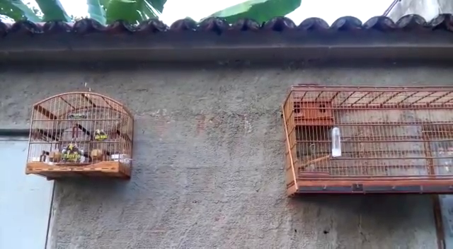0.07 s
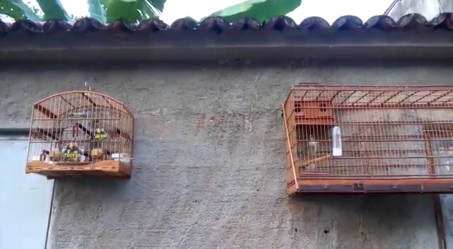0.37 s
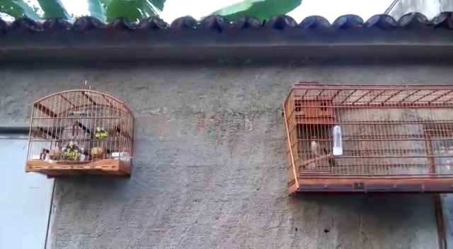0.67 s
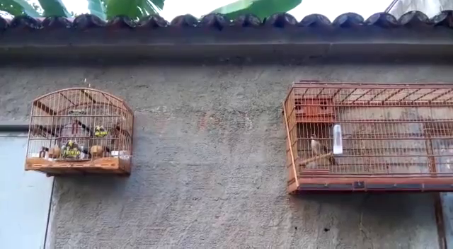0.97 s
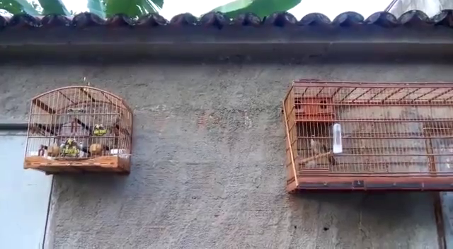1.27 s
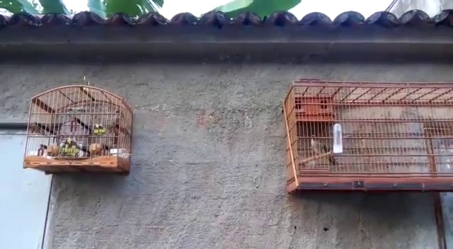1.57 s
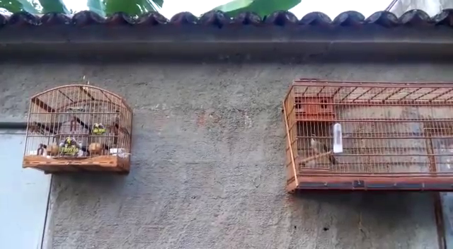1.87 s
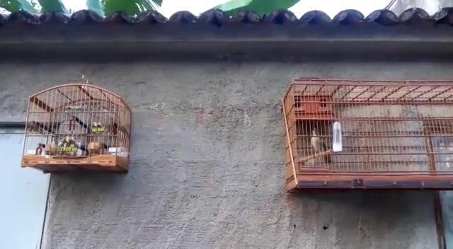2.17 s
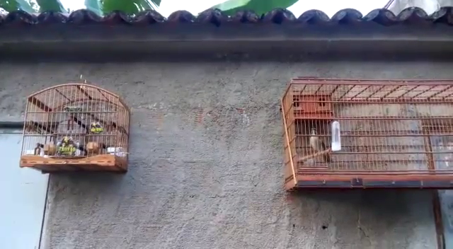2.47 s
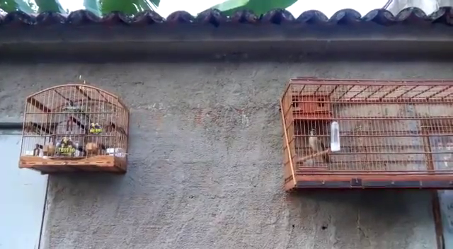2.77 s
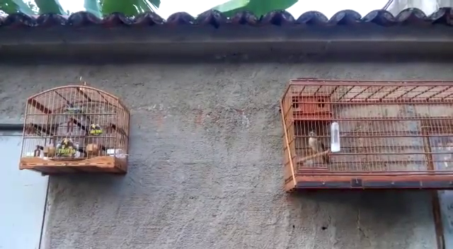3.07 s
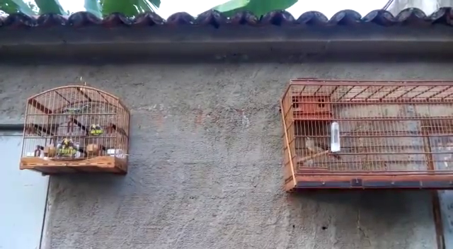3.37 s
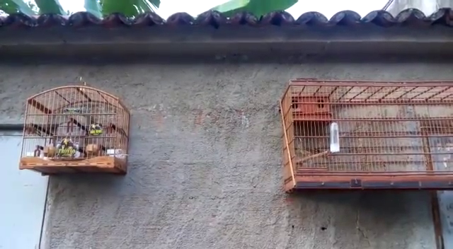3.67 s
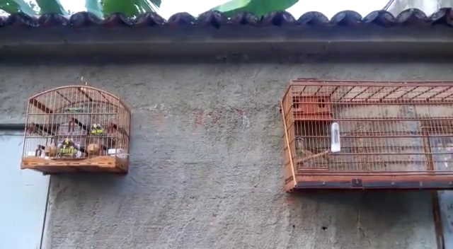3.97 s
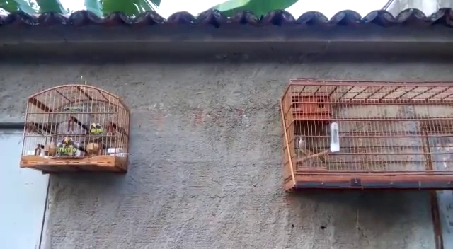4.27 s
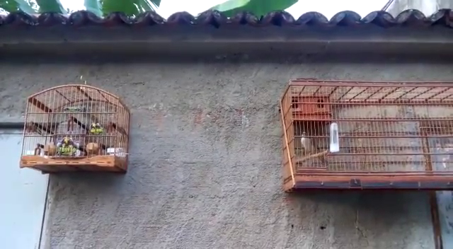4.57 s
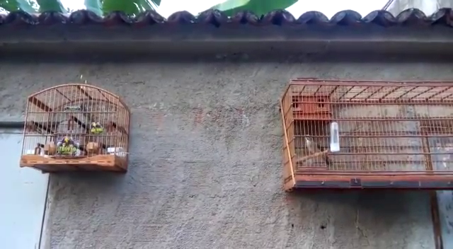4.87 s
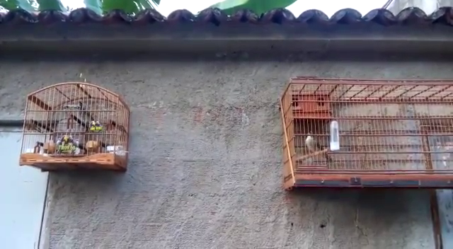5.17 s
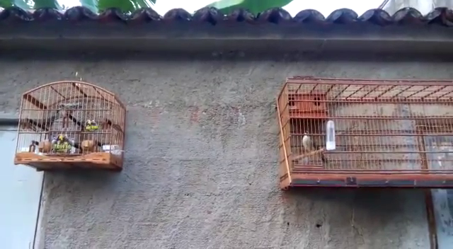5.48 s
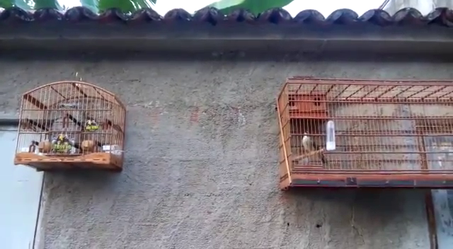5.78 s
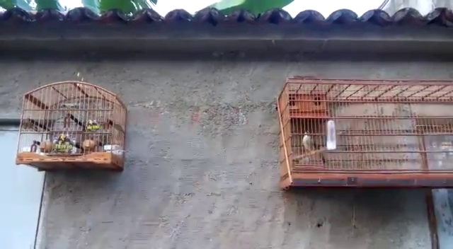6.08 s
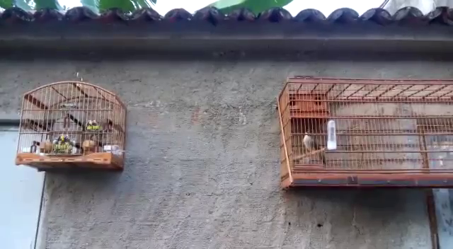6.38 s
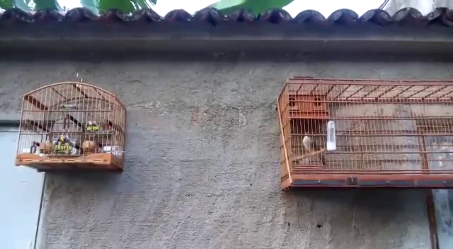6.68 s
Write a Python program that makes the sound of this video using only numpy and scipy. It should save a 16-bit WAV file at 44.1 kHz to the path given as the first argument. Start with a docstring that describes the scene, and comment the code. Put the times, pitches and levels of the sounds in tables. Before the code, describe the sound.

Faint outdoor air and a thin hiss fill a walled yard for about seven seconds. A nearby caged songbird gives a very short, piercing chirp right at the start, slightly overloading the microphone. Its cage ticks lightly around 0.6 and 1 second. At about 1.3 seconds one hard, sharp knock echoes briefly off the walls. A second loud chirp comes at 2.8 seconds. Throughout, other birds farther off give soft hoarse calls, thin high notes and a few faint hoots. Between 4 and 5 seconds the cage ticks again and a faint low rumble swells, returning around 6 seconds. From 5.4 seconds to the end, the songbird sings five clear falling whistles in quick succession, growing louder, the last one longer and fading away. Two more sharp chirps cut in among them at 6 and 6.7 seconds.

```python
"""Over faint outdoor air and a far hoarse call, a caged songbird chirps sharply in a walled yard. Both sides of
its syrinx sound at once and beat; the loudest chirps flatten at full scale. The cage ticks as it hops, other
birds call and hoot softly farther off, and one hard knock echoes round the walls. A low rumble swells, and the
songbird ends on a run of five falling whistles with two more chirps among them."""
import sys
import numpy as np
from scipy import signal
from scipy.fft import rfft, irfft
from scipy.io import wavfile

SR = 44100
rng = np.random.default_rng(int(sys.argv[2]) if len(sys.argv) > 2 else 0)


def store_wav(level_fs):
    """Save 16-bit WAV to argv[1]."""
    pcm = np.round(np.clip(np.atleast_2d(level_fs), -1, 1) * 32767)
    wavfile.write(sys.argv[1], SR, pcm.T.astype(np.int16))


N = 300762
TIME = np.arange(N) / SR


def from_db(db):
    return 10 ** (np.asarray(db) / 20)


def rms_one(x):
    return x / np.sqrt(np.mean(x ** 2) + 1e-20)


def at_hz(points, hz):
    """Read a curve on a log-frequency axis."""
    freqs, values = np.transpose(points)
    return np.interp(np.log(np.maximum(hz, 1)), np.log(freqs), values)


def coloured(x, eq):
    """Shape a sound with an EQ curve."""
    hz = np.arange(len(x) // 2 + 1) * SR / len(x)
    return irfft(rfft(x) * from_db(at_hz(eq, hz)), len(x))


def drift(rate_hz):
    """Random wander of spread 1, changing rate_hz times a second."""
    return rms_one(np.interp(TIME * rate_hz, np.arange(N), rng.standard_normal(N)))


def during(start_s, length_s):
    """The samples of a note, and the time since its start."""
    on = (TIME >= start_s) & (TIME < start_s + length_s)
    return on, TIME[on] - start_s


def swell(t, length_s, attack_s, release_s):
    """Smooth fade in and fade out."""
    rise = np.sin(np.pi / 2 * np.clip(t / attack_s, 0, 1))
    fall = np.sin(np.pi / 2 * np.clip((length_s - t) / release_s, 0, 1))
    return (rise * fall) ** 2


def reverb(x, tail):
    """Play a sound through a tail scaled to unit energy."""
    return signal.fftconvolve(x, tail / np.sqrt(np.sum(tail ** 2)))[:N]


# EQ of the outdoor air: freq_hz, gain_db
AIR_EQ = [(15, -48), (25, -27.5), (32, -19.5), (46, -10), (74, 0), (161, -3.5), (204, -8), (319, -7),
          (414, -11.5), (500, -9), (801, -13), (1670, -17), (1960, -21), (5680, -22.5), (7020, -25.5),
          (9130, -56), (15400, -120)]
# EQ of the neighbourhood rumble: freq_hz, gain_db
RUMBLE_EQ = [(50, -19), (110, -11), (150, 3), (230, -6), (550, -12.5), (1200, -27.5), (3000, -47)]
# fader ride on the rumble: time_s, level_db
RUMBLE_RIDE = [(0, -78.5), (3.8, -76), (4.2, -66), (4.45, -62.5), (4.8, -73), (5.3, -71), (6.0, -66.5),
               (6.82, -77)]
# EQ of the hiss: freq_hz, gain_db
HISS_EQ = [(3000, -36.5), (4500, -10), (5800, 1), (6700, -12), (7600, -19), (10000, -20.5), (16000, -23)]
def background():
    """Outdoor air, a slowly swelling rumble and a thin steady hiss."""
    air, rumble, hiss = (rms_one(coloured(rng.standard_normal(N), eq))
                         for eq in (AIR_EQ, RUMBLE_EQ, HISS_EQ))
    air_db = -64 + 0.6 * drift(2.7)
    rumble_db = np.interp(TIME, *np.transpose(RUMBLE_RIDE))
    return from_db(air_db) * air + from_db(rumble_db) * rumble + from_db(-72) * hiss


# how well the beak lets overtones out: freq_hz, gain_db
BEAK_EQ = [(3500, -30), (4700, -15.5), (5700, 11), (6800, 1.5), (8500, -10), (10800, 4.5), (11800, -2.5),
           (14000, -10)]
def syrinx(notes, waver, waver_hz, ragged_db, overtones_db=(), rasp_hz=0):
    """Sing each note (samples, pitch, gain, rasp) as a near sine; rasp flutters its pitch and level."""
    out = np.zeros(N)
    wander, unsteady, effort = drift(waver_hz), drift(200), drift(90)
    for on, hz, gain, rasp in notes:
        flutter = rasp * np.sin(2 * np.pi * rasp_hz * TIME[on] + unsteady[on])
        pitch = hz * (1 + waver * wander[on]) * (1 + 0.15 * flutter)
        level = gain * from_db(ragged_db * effort[on]) * (1 + 0.29 * flutter)
        phase = 2 * np.pi * np.cumsum(pitch) / SR
        # overtones come and go with small changes of effort
        overtones = sum(from_db(db + at_hz(BEAK_EQ, k * pitch) + 2 * effort[on]) * np.sin(k * phase)
                        for k, db in enumerate(overtones_db, 2))
        out[on] += level * (np.sin(phase) + overtones)
    return out


def smear(x):
    """Roofs and leaves scatter each note."""
    t = TIME[:SR // 8]
    return reverb(x, rng.standard_normal(len(t)) * np.exp(-t / 0.03))


# reverb time of the yard: freq_hz, t60_s
YARD_DECAY = [(150, 0.28), (600, 0.63), (1500, 0.67), (3500, .58), (6000, 0.43), (9000, 0.25),
              (15000, 0.16)]
def yard(x, build_s):
    """The diffuse ring of the yard builds up, then dies fastest in the treble."""
    t, hz = TIME[:SR], np.arange(SR // 2 + 1)
    white = rfft(rng.standard_normal(SR))
    edges_hz = np.r_[0, np.geomspace(200, SR / 2, 14)]
    tail = np.zeros(SR)
    for low, high in zip(edges_hz, edges_hz[1:]):
        band = irfft(white * (hz >= low) * (hz < high), SR)
        tail += band * from_db(-60 * t / at_hz(YARD_DECAY, (low + high) / 2))
    return reverb(x, tail * (1 - np.exp(-t / build_s)))


def slur(start_s, length_s, upper_hz, level_db, lower_hz=3395, sag_hz=524):
    """An upper note breaks down to a lower one, which sags."""
    on, t = during(start_s, length_s)
    progress = t / length_s
    drop = np.tanh((progress - 0.52) / 0.11)
    hz = np.interp(drop, [-1, 1], [upper_hz, lower_hz]) - sag_hz * progress ** 4
    dip_db = 3.5 * (1 - drop ** 2)  # the voice thins at the break
    return on, hz, from_db(level_db - dip_db) * swell(t, length_s, attack_s=0.04, release_s=0.034), 0


def hoot(start_s, length_s, pitch_hz, level_db):
    """One held pitch that swells and fades."""
    on, t = during(start_s, length_s)
    return on, pitch_hz, from_db(level_db) * swell(t, length_s, attack_s=0.055, release_s=0.067), 0


# hoarse two-note calls: start_s, length_s, upper_hz, level_db
SLUR_CUES = [(.01, 0.093, 4556, -46.5), (0.192, 0.081, 4250, -52.5), (0.836, 0.11, 4550, -61),
             (1.083, 0.096, 4270, -52.5), (1.411, 0.07, 4750, -41), (1.82, .055, 3950, -58),
             (3.195, 0.1, 4250, -53.5), (3.568, 0.097, 4810, -53), (3.799, .09, 4290, -54),
             (4.271, 0.079, 4930, -39.5), (4.475, 0.095, 4246, -48), (5.163, .08, 3500, -56),
             (5.463, 0.094, 4016, -55)]
# pitches favoured on the way from the distant birds: freq_hz, gain_db
DISTANCE_EQ = [(2800, -1), (3300, 0), (3850, -3), (4270, 4.5), (4450, -0.5), (4700, 1), (4950, -0.5),
               (5350, 7.5), (5800, -6)]
# faint hoots: start_s, length_s, pitch_hz, level_db
HOOT_CUES = [(2.10, 0.084, 1608, -62.5), (4.152, 0.099, 628, -57.5), (6.268, 0.21, 629, -61),
             (6.661, 0.085, 1326, -49)]
def far_birds():
    """Distant hoarse calls and hoots arrive as reflections."""
    calls = syrinx([slur(*cue) for cue in SLUR_CUES], waver=0.055, waver_hz=800, ragged_db=3.5)
    hoots = syrinx([hoot(*cue) for cue in HOOT_CUES], waver=0.07, waver_hz=120, ragged_db=2)
    voices = coloured(calls, DISTANCE_EQ) + hoots
    return from_db(-5) * smear(voices) + from_db(-6) * yard(voices, build_s=0.0031)


def scoop(start_s, length_s, first_hz, turn_hz, last_hz, turn_share, attack_s, level_db):
    """The pitch swoops to a turning point and flicks up from it."""
    on, t = during(start_s, length_s)
    progress = t / length_s
    away = np.interp(progress, [0, turn_share, 1], [1, 0, 1]) ** 1.6  # roundness: 1 is a V, 2 a U
    hz = turn_hz + away * (np.where(progress < turn_share, first_hz, last_hz) - turn_hz)
    return on, hz, from_db(level_db) * swell(t, length_s, attack_s, release_s=0.011), 0


# sharp chirps: start_s, length_s, first_hz, turn_hz, last_hz, turn_share (0-1), attack_s, level_db
CHIRP_CUES = [ (.132, .057, 7170, 5697, 6884, .66, .03, -1.5),
              (1.750, 0.031, 7310, 5500, 5600, 0.97, .012, -64.5),
              (2.825, .053, 7365, 5758, 7050, .66, .022, -4),
              (6.000, .048, 6800, 5352, 7050, 0.55, 0.0085, -5.5),
              (6.72, 0.032, 4760, 4920, 7495, 0.069, 0.02, -6.5)]
def caged_chirps():
    """One side of the syrinx sings a deep scoop; the other beats against it with a weak, shallow one."""
    deep = [scoop(*cue) for cue in CHIRP_CUES]
    shallow = [scoop(start_s, length_s, first_hz=6000, turn_hz=5523, last_hz=6000, turn_share=0.6,
                     attack_s=0.7 * length_s, level_db=level_db - 7)
               for start_s, length_s, *_, level_db in CHIRP_CUES]
    chirps = syrinx(deep, waver=0.011, waver_hz=420.2, ragged_db=1, overtones_db=[-28])
    chirps += syrinx(shallow, waver=0.008, waver_hz=400.6, ragged_db=3)
    reflections = wall_echoes(chirps) + from_db(-12) * yard(chirps, build_s=0.009)
    return chirps + reflections + from_db(-48) * far_houses(chirps)


# slaps off the wall behind the cage and across the yard: delay_s, gain_db
WALL_TAPS = [(.0029, -20), (.0056, -2), (.025, -15.5), (.039, -26.5), (.051, -17)]
def wall_echoes(x):
    """Distinct echoes beat against a gliding note."""
    return sum(from_db(db) * np.interp(TIME - delay_s, TIME, x, left=0) for delay_s, db in WALL_TAPS)


def far_houses(x, t60_s=1.7):
    """A long tail comes back from the houses beyond the yard."""
    return reverb(x, rng.standard_normal(SR) * from_db(-60 * TIME[:SR] / t60_s))


def blows(cues, scatter_s, scatter_db):
    """Each blow is a sharp pulse followed by a few milliseconds of scatter."""
    out, t = np.zeros(N), TIME[:SR // 20]
    for start_s, level_db, lowpass_hz in cues:
        pulse = from_db(scatter_db) * rng.standard_normal(len(t)) * np.exp(-t / scatter_s)
        pulse[0] += 2
        lowpass = signal.butter(2, lowpass_hz, fs=SR, output="sos")
        start = int(start_s * SR)
        out[start:start + len(t)] += from_db(level_db) * signal.sosfilt(lowpass, pulse)
    return out


# light ticks of the cage: start_s, level_db, lowpass_hz
TICK_CUES = [(.648, -43, 8950), (.672, -49.5, 7230), (.984, -42.5, 7750), (4.148, -49, 8000),
             (4.165, -49, 8040), (4.802, -46, 7950)]
# EQ of the ticks: freq_hz, gain_db
TICK_EQ = [(200, 13), (1500, -8), (4000, -3.5), (6200, 11), (12000, -37)]
def cage_ticks():
    """Claws touch the perch and bars."""
    ticks = coloured(blows(TICK_CUES, scatter_s=0.0056, scatter_db=-5.5), TICK_EQ)
    return ticks + from_db(-6.5) * yard(ticks, build_s=0.015)


def arch(start_s, length_s, top_hz, level_db, rasp, rise_hz=998, rise_s=0.016, sag_hz=910):
    """The pitch rises quickly, flattens and sags late."""
    on, t = during(start_s, length_s)
    hz = top_hz - rise_hz * np.exp(-t / rise_s) - sag_hz * (t / length_s) ** 2.7
    return on, hz, from_db(level_db) * swell(t, length_s, attack_s=0.04, release_s=0.06), rasp


# thin arched calls: start_s, length_s, top_hz, level_db, rasp (0-1)
ARCH_CUES = [(1.15, 0.15, 5300, -58.5, 0.55), (2.29, .14, 5433, -53.5, 0.1),
             (2.64, 0.16, 5320, -53.5, 0.16), (3.808, 0.13, 5700, -51.5, .02),
             (4.922, 0.15, 5430, -45.5, 0.05), (5.93, 0.092, 5300, -51, .4), (6.38, 0.11, 5340, -49, .6),
             (6.555, 0.16, 5570, -47, 0.1)]
def soft_bird(lead_s=0.038):
    """Thin calls over a hoarse lower voice that starts a little sooner, wet with the ring of the yard."""
    upper_notes = [arch(*cue) for cue in ARCH_CUES]
    lower_notes = [arch(start_s - lead_s, length_s, 0.88 * top_hz, level_db - 10.5, rasp)
                   for start_s, length_s, top_hz, level_db, rasp in ARCH_CUES]
    upper = syrinx(upper_notes, waver=0.008, waver_hz=498, ragged_db=4, rasp_hz=129.4)
    lower = syrinx(lower_notes, waver=0.075, waver_hz=600, ragged_db=3, rasp_hz=131)
    return from_db(-2) * upper + from_db(-3.5) * (smear(lower) + yard(upper + lower, build_s=0.005))


# the knock, then its slaps off the walls: start_s, level_db, lowpass_hz
KNOCK_CUES = [(1.2528, -20, 5000), (1.2555, -4, 15000), (1.2582, -15.5, 15170), (1.2775, -14, 5020),
              (1.2808, -16, 6000), (1.2876, -22, 5940), (1.2903, -11, 6760), (1.2927, -12, 6900),
              (1.333, -12, 3570), (1.3375, -14.5, 5600)]
# EQ of the crack: freq_hz, gain_db
CRACK_EQ = [(30, -50), (70, -16), (130, -5), (300, 0.5), (600, -0.5), (1200, 0), (2500, 1.5), (4000, 0.5),
            (6000, 12), (9000, -0.5), (15000, -6.5), (17000, -30)]
# ring of the struck object: pitch_hz, level_db, t60_s
BODY_MODES = [(378, -40.5, 0.27), (543, -34.5, 0.56), (637, -83, 0.098), (974, -36, 0.39),
              (1510, -68, 0.058), (2510, -24.5, 0.064)]
def knock():
    """A hard crack sets a few modes and the whole yard ringing; the walls swallow its treble."""
    crack = coloured(blows(KNOCK_CUES, scatter_s=0.0026, scatter_db=-8), CRACK_EQ)
    t, start = TIME[:SR], int(KNOCK_CUES[0][0] * SR)
    ring = np.zeros(N)
    for pitch_hz, level_db, t60_s in BODY_MODES:
        ring[start:start + SR] += from_db(level_db - 60 * t / t60_s) * np.sin(2 * np.pi * pitch_hz * t)
    reverb_send = coloured(crack, eq=[(2500, 2.5), (6500, -1), (9000, 3)])
    return crack + ring + from_db(-5) * yard(reverb_send, build_s=0.0022)


# how well each pitch carries from the cage, so whistles dip at the same pitches: freq_hz, gain_db
CARRY_EQ = [(1620, -18), (1860, -9), (2040, -14.5), (2110, -9.5), (2230, -0.5), (2330, -1), (2390, -6),
            (2500, 1), (2620, -1), (2820, 0), (2905, -9), (3010, 0.5), (3450, 0), (3700, -3.5)]
def whistle(start_s, length_s, top_hz, last_hz, hold_s, easing, flick_hz, rasp_s, attack_s,
            level_db, fade_db):
    """The note holds its top pitch, then falls ever more slowly and clears; loudness follows pitch."""
    on, t = during(start_s, length_s)
    fall_progress = np.maximum(t - hold_s, 0) / (length_s - hold_s)
    fallen = np.expm1(-easing * fall_progress) / np.expm1(-easing)
    hz = top_hz + (last_hz - top_hz) * fallen - flick_hz * np.exp(-t / 0.0069)
    late_fade_db = fade_db * (t / length_s) ** 2.77
    gain = from_db(level_db + at_hz(CARRY_EQ, hz) - late_fade_db)
    rasp = 0.046 + np.exp(-t / rasp_s)  # a trace of rasp stays in the clear note
    return on, hz, gain * swell(t, length_s, attack_s, release_s=0.014), rasp


# falling whistles: start_s, length_s, top_hz, last_hz, hold_s, easing (higher flattens the fall sooner),
# flick_hz (upward, at the onset), rasp_s, attack_s, level_db, fade_db
WHISTLE_CUES = [ (5.399, .232, 3025, 2219, 0.061, 1.5, -1, .003, 0.11, -28, 7.5),
                (5.696, 0.2, 1998, 1610, 0.046, 0.89, -7, 0.1, 0.06, -23.5, 0),
                (5.936, .216, 2788, 1645, 0.0097, 0.76, -5.5, 0.022, 0.084, -19.5, -2),
                (6.18, 0.21, 3043, 1754, 0.027, 1.1, 888, 0.0018, 0.038, -18, -1),
                (6.431, 0.39, 3669, 2002, .030, 0.51, -1.5, 0.0024, 0.072, -15, 18.5)]
def caged_whistles():
    """The songbird's run of nearly pure whistles, with a light touch of walls and yard."""
    notes = [whistle(*cue) for cue in WHISTLE_CUES]
    whistles = syrinx(notes, waver=0.0036, waver_hz=121.1, ragged_db=1.67,
                      overtones_db=[-30, -42], rasp_hz=161.3)
    slaps = from_db(-15.5) * wall_echoes(whistles)
    return whistles + slaps + from_db(-19.5) * yard(whistles, build_s=0.0068)


def microphone(x, edge_hz=7100, shelf_db=-7.5):
    """The response drops to a lower shelf above its treble edge."""
    below = signal.sosfilt(signal.butter(14, edge_hz, fs=SR, output="sos"), x)
    above = signal.sosfilt(signal.butter(8, edge_hz, "high", fs=SR, output="sos"), x)
    return below + from_db(shelf_db) * above


def scene():
    """Birds, ticks and knock reach the microphone over the outdoor background, in mono."""
    bed = background()
    events = far_birds() + caged_chirps() + cage_ticks() + soft_bird() + knock() + caged_whistles()
    return (bed + microphone(events))[None]


def record(dry, cutoff_hz=16800):
    """Peaks clip at full scale with a slightly rounded knee and crackle faintly; the top is cut."""
    clipped = dry / (1 + dry ** 10) ** (1 / 10)
    overload_noise = (np.abs(dry) > 1) * rng.standard_normal(dry.shape)
    crackle = from_db(-42.5) * signal.lfilter([0.7], [1, -0.3], overload_noise)
    lowpass = signal.cheby2(12, 70, cutoff_hz, fs=SR, output="sos")
    return signal.sosfilt(lowpass, clipped + crackle)


dry = scene()
out = record(dry)
store_wav(out)
```